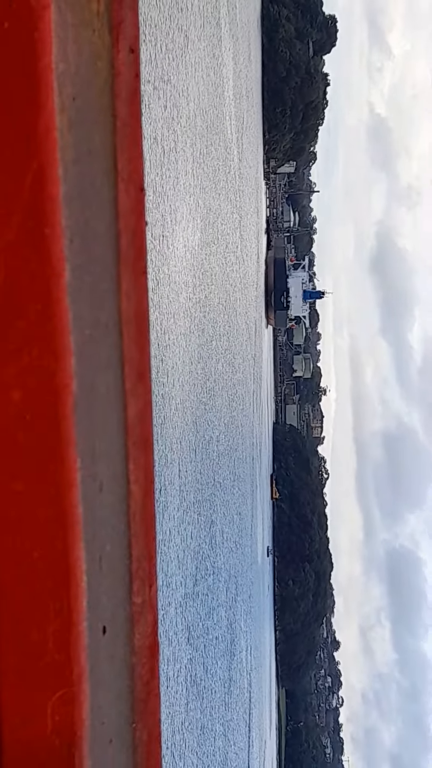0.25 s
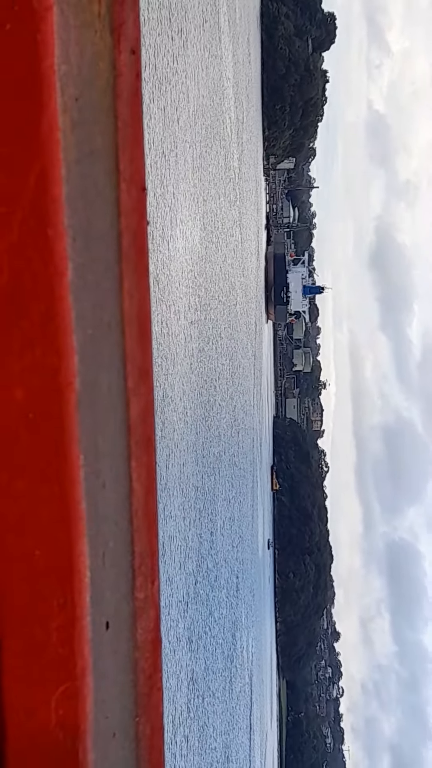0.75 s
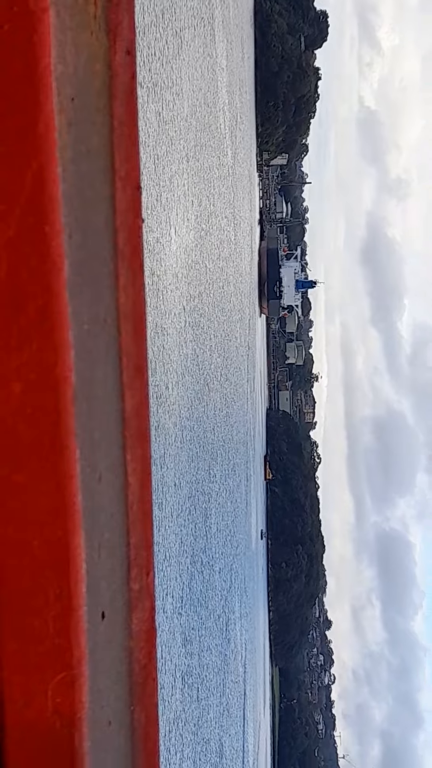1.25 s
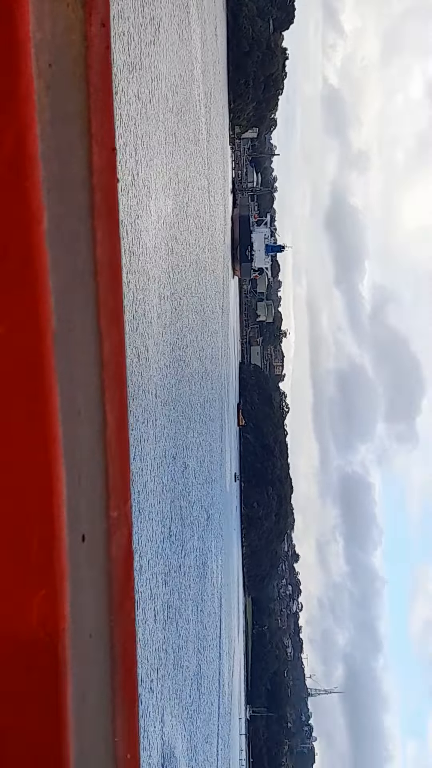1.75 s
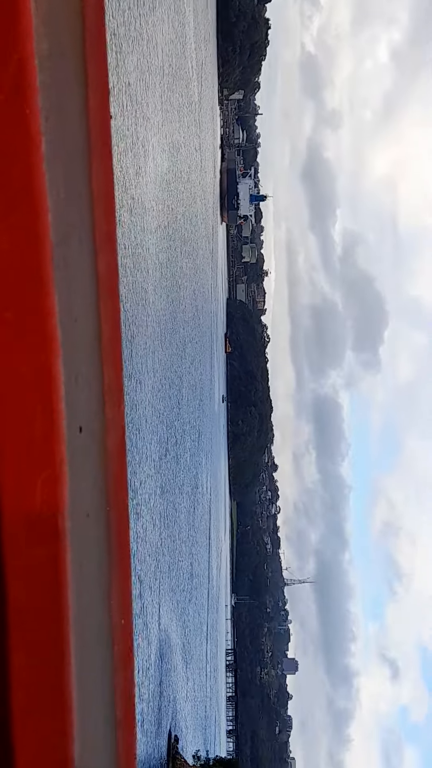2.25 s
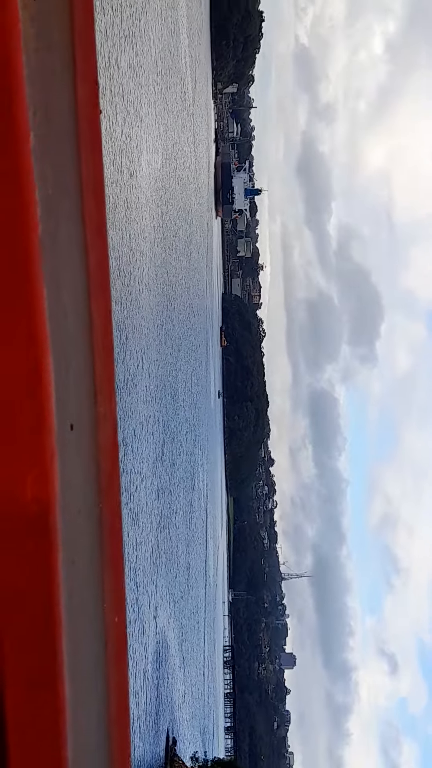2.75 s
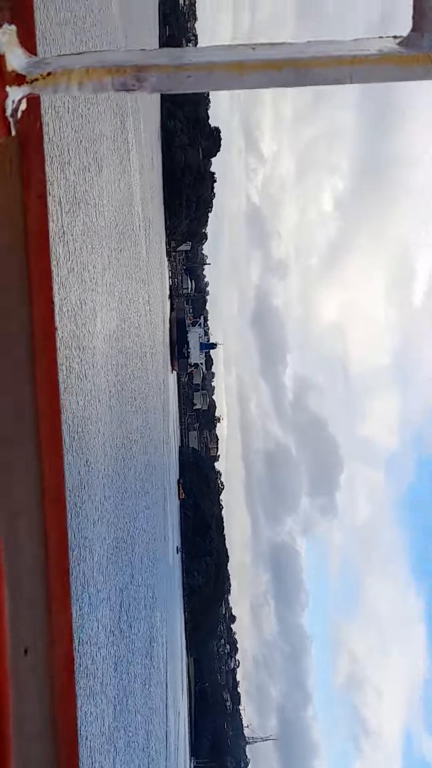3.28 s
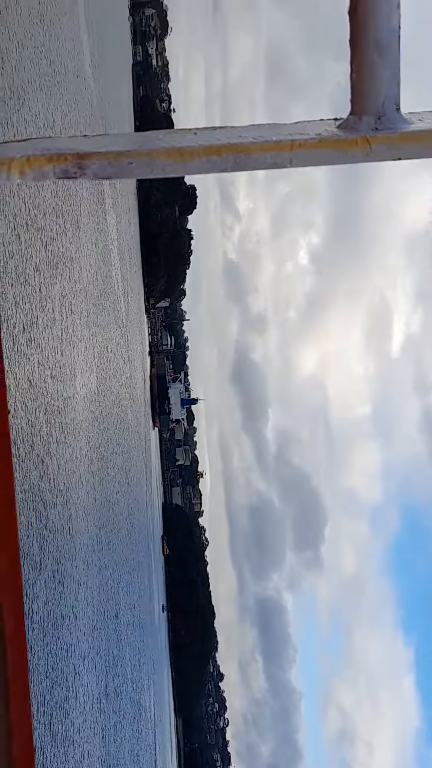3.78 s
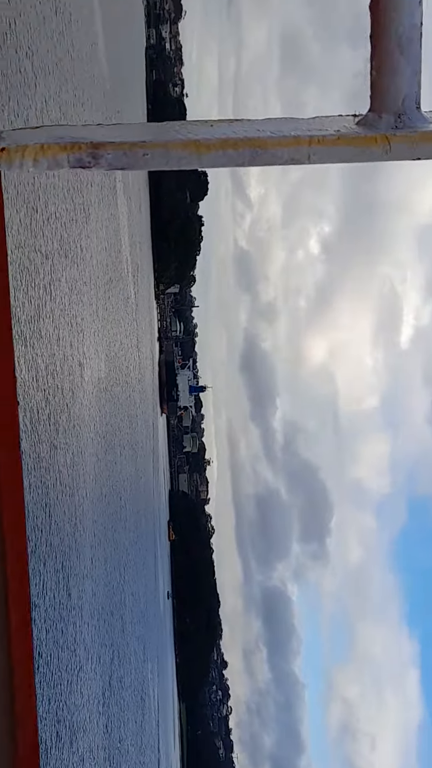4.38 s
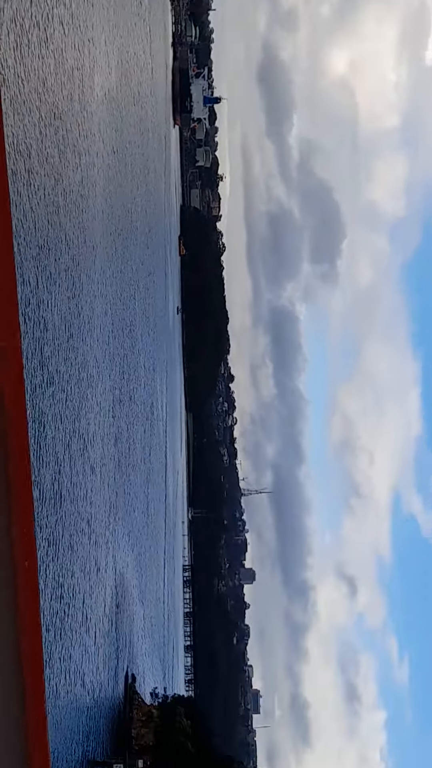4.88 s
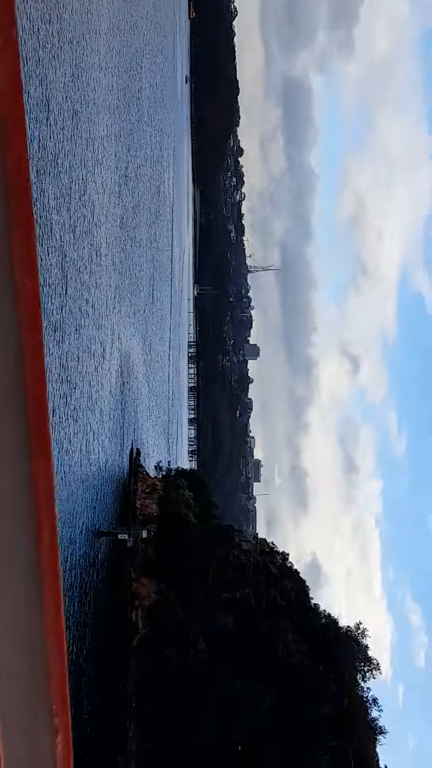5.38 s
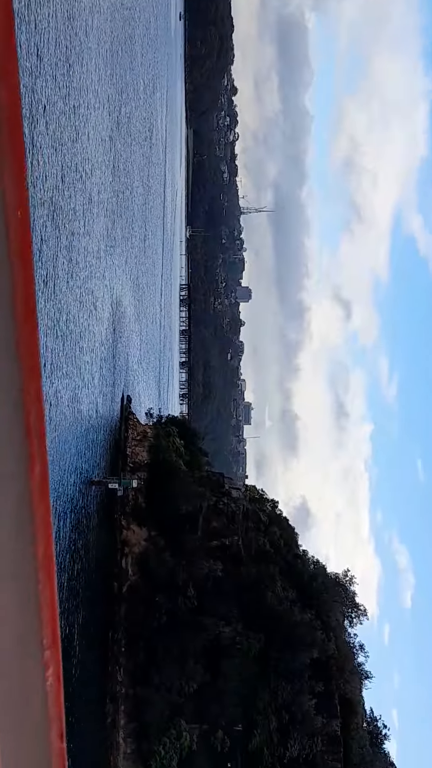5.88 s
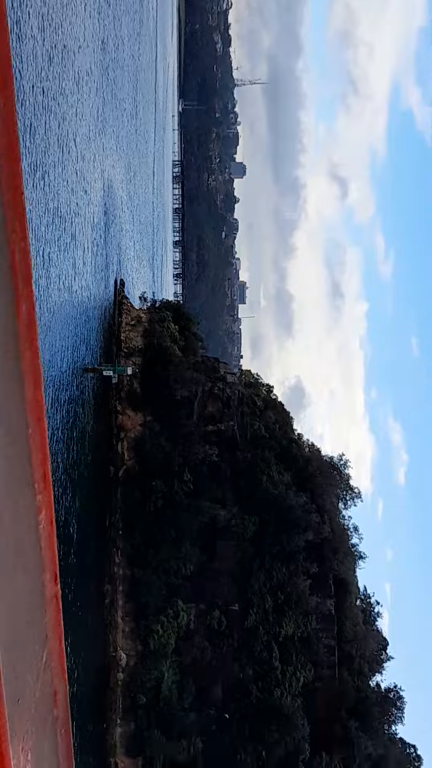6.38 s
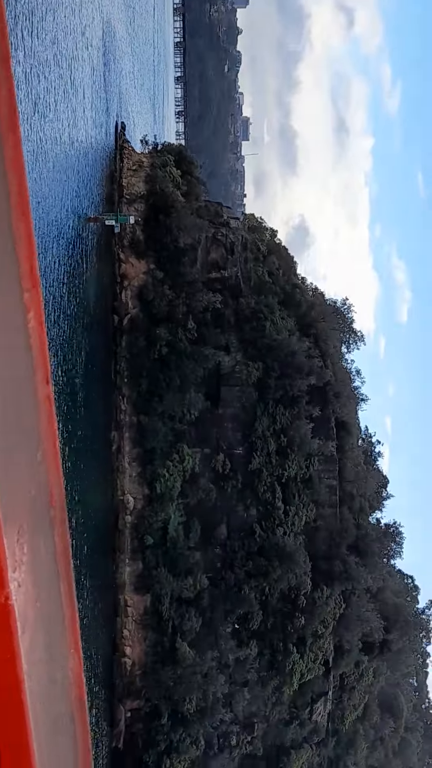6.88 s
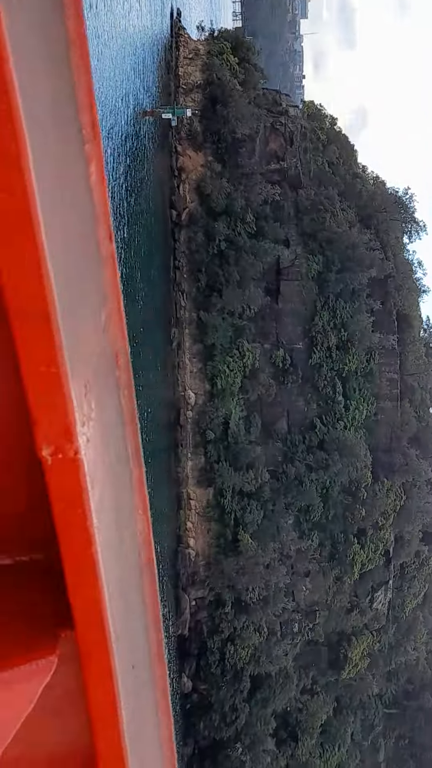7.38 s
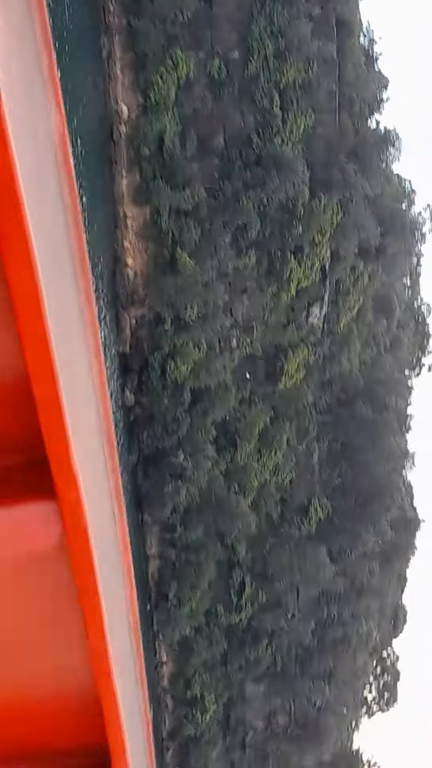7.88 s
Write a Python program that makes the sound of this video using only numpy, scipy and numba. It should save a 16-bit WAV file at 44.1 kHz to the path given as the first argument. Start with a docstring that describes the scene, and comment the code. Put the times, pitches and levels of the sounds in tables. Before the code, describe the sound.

A ship's engines throb low and steadily on an open deck for the whole eight seconds, their pulse waxing and waning under several humming machinery tones and the even roar of vents. At first a finger covers the left side of the hand-held microphone, so only the low drone comes through there, while the right side is clear. Near 2.7 seconds a few tiny, high ticks sound on the right. At about 3.2 seconds the finger peels off with a short crackling pop, and the left side opens up to the full hum and roar. From there until about 5.5 seconds the hand rustles softly on the casing in short bursts, mostly on the left, then trails away. As the microphone turns, some of the louder tones swell and dip, and the drone carries on to the end.

```python
"""On a ship's open deck two slow engines throb against each other over humming gears, pumps and
generators and roaring vents. At first a finger seals the left port of a slowly turning hand-held
phone, so that side is muffled. Near 2.7 s small ticks sound on the right. At 3.2 s the finger peels
off with a pop and the left opens up. The hand then rustles on the case in bursts, and the loud
tones swell and dip as the phone sweeps through their standing waves."""
import sys
import numpy as np
from scipy import signal
from scipy.fft import rfft, irfft
from scipy.io import wavfile
from scipy.ndimage import map_coordinates
from numba import njit

SR = 44100
rng = np.random.default_rng(int(sys.argv[2]) if len(sys.argv) > 2 else 0)


def digitize_waveform(pressure):
    """Quantize a signal to 16-bit integers and store it at the path in sys.argv[1].

    Rows of a 2-D input are taken as channels; values are limited to [-1, 1].
    """
    field = np.atleast_2d(pressure).T
    bounded = np.clip(field, -1, 1)
    quanta = np.round(bounded * 32767).astype(np.int16)
    wavfile.write(sys.argv[1], SR, quanta)


N = 358974
T = np.arange(N) / SR
HZ = np.arange(1, N // 2 + 2) * SR / N

# bed of vent roar: (frequency [Hz], left [dB/Hz], right [dB/Hz])
ROAR_BED = [(25,-75,-72), (40,-66,-59), (59.6,-53,-50), (111,-57,-53), (208,-61,-60), (304,-64.5,-56),
            (456,-67.5,-66.5), (836,-73,-75.5), (1200,-73.5,-79.5), (2150,-73,-81), (3260,-80,-91.5),
            (4980,-85,-94), (6460,-88,-112), (7760,-105,-122)]
# humps around the gear tones: (centre [Hz], width [Hz], level over the bed [dB])
ROAR_HUMPS = [(337.3, 23, 9), (677, 22, 15.5), (997, 48, 15.5), (1327, 41, 13), (1730, 48, 0.5),
              (1968, 63, 4.5), (2983, 40, 2.5)]
# slow ride on the roar: (time [s], gain [dB])
ROAR_SWELL = [(0, 0), (2, -0.5), (3.3, -0.5), (4.5, 0), (6, 1), (7, 1), (8.14, 1)]
# stereo image of the roar: (frequency [Hz], left-right likeness [-1..1])
ROAR_LIKENESS = [(60, 0.98), (240, 0.35), (950, 0.0075), (3770, -0.25), (15000, 0.23)]
# steady machinery hums: (pitch [Hz], left [dB], right [dB], left lead [rad])
HUMS = [(94, -46.1, -47.4, 0.6), (102.6, -49.1, -50.6, 0.2), (112.6, -45.1, -45.4, 0.7),
        (115.1, -48.1, -46.6, 0.1), (120.4, -42.3, -42.3, 0.2), (124, -47.1, -45.9, 0.4),
        (150.48, -35, -34, 0.5), (210.6, -44.3, -43.3, 0.9), (240.9, -48.7, -50.5, 0.7),
        (270.625, -27.4, -26.3, 0.3), (324.7, -47.4, -45.2, 0.4), (337.43, -42.6, -41.7, 0.6),
        (361.5, -39.9, -36.9, 1.7), (391.3, -49.7, -49.1, 1.1), (925.5, -45.6, -50.8, -2.1),
        (993.2, -44.8, -46.9, 2.5), (1001.8, -43.1, -46.9, -2.1), (1027.2, -48.6, -57.0, -2.8),
        (1052.8, -47.4, -54.9, -2.0), (1655.4, -55.9, -64.6, -1.1), (1797.4, -58.3, -68.1, -2.3),
        (2317.5, -61.4, -73.9, -0.1)]
# gear sidebands, split off by the shaft rate: (pitch [Hz], left [dB], right [dB], left lead [rad])
GEAR_SIDEBANDS = [(952, -46, -51, 3.0), (980, -48, -53, 3.0)]
# faint pump and gear whines: (pitch [Hz], left [dB], right [dB])
FAINT_WHINES = [(423, -57.0, -57.0), (441, -55.0, -58.0), (571, -54.0, -59.0), (681, -51.0, -52.0),
                (875, -56.0, -61.0), (1090, -61.0, -65.0), (1176, -71.0, -66.0), (1437, -61.0, -73.0),
                (1688, -61.0, -71.0), (1873, -66.0, -69.0), (2070, -62.0, -71.0), (2958, -73.0, -79.0)]
# envelope of the low hum: (time [s], level [dB])
LOW_HUM = [(0, -28), (1.2, -34), (2.6, -41), (5, -43), (8.14, -42)]
# tones standing between the plating: (pitch [Hz], level [dB], bearing [deg],
# then for each of two echoes: level [dB], bearing [deg], extra path [m])
STANDING_TONES = [(331.07, -36.2, -159.0, -25.2, 168.0, 0.305, -33.5, -98.0, 0.454),
                  (541.3, -51.0, 105.0, -42.0, -166.0, 0.026, -43.4, -62.0, 0.53),
                  (662.15, -31.3, -154.0, -34.4, 127.0, 0.257, -31.4, -131.0, 0.223),
                  (718.9, -44.0, -68.0, -38.2, 151.0, 0.196, -45.0, 85.0, 0.011),
                  (957.2, -48.7, 146.0, -43.5, -155.0, 0.33, -44.8, -103.0, 0.222),
                  (963.6, -46.0, 34.0, -46.1, 162.0, 0.12, -45.6, 100.0, 0.344),
                  (969.97, -43.2, -151.0, -48.5, 94.0, 0.258, -42.6, -54.0, 0.139),
                  (1324.3, -50.8, -15.0, -56.6, -70.0, 0.151, -48.8, 55.0, 0.049)]
# the phone's slow sweep: (time [s], heading [deg], along the deck [m], across the deck [m])
SWEEP = [(0.0, 0.0, 0.0, 0.0), (1.3, -5.0, 0.016, -0.002), (2.6, -11.0, 0.023, 0.001),
         (3.7, 23.0, -0.02, -0.045), (4.4, 24.0, -0.042, -0.045), (5.0, 1.0, 0.038, -0.009),
         (5.6, -45.0, 0.052, 0.048), (6.2, -31.0, 0.081, 0.064), (6.7, 14.0, 0.16, 0.101),
         (7.2, 30.0, 0.167, 0.145), (7.6, 33.0, 0.182, 0.187), (8.14, 63.0, 0.315, 0.269)]
# main engines: (speed [cycles/s], starting crank position [cycles])
ENGINES = [(8.043, .161), (8.2655, .506)]
# exhaust beats, one list per engine: (harmonic [x speed], level [dB])
EXHAUST_BEATS = [
    [(6, -55), (7, -24.5), (8, -29.5), (9, -55.5)],
    [(7, -42.5), (8, -26.5), (9, -36), (10, -55)],
]
# rubs of the hand: (start [s], hold [s], left [dB], right [dB], fade [dB/s])
RUBS = [(2.7, .07, -99, -71, 249.5), (3.205, .004, -49, -95, 1500), (3.22, .015, -58, -96, 170),
        (3.545, .03, -52, -77, 190), (3.65, .02, -54.5, -80, 90), (3.87, .11, -48.5, -70, 90),
        (4.08, .02, -61, -82, 301), (4.34, .03, -63.5, -90, 70), (4.58, .24, -63.5, -90, 100.5),
        (5.25, .13, -58.5, -78, 11)]
# colour of rubbing skin: (frequency [Hz], relative level [dB])
RUB_COLOUR = [(5000, -30), (8000, -22), (10000, -8), (12000, -4), (14500, 0), (16000, -2)]
# colour of the resting grip: (frequency [Hz], relative level [dB])
GRIP_COLOUR = [(6000, -20), (8000, -9), (10500, 0), (13000, -4), (16000, -8)]
# ticks by the right port: (time [s], level before filtering [dB])
TICKS = [(2.719, -44), (2.742, -40), (2.762, -38), (2.774, -41), (2.786, -39), (2.803, -38), (2.812, -27),
         (3.366, -48), (4.135, -48)]
# low-pass of the finger's seal: (time [s], corner [Hz])
SEAL_CORNER = [(0, 119), (2.9, 113.4), (3.2, 111), (3.236, 300), (3.25, 9000), (3.27, 20000)]
# skin slipping off the port: (time [s], pressure jump [dB], suction before it [dB])
SLIPS = [(3.2110, -6, -26), (3.2198, 0, -11), (3.2290, -3, -20), (3.2410, -1, -8), (3.2452, -12, -11),
         (3.2493, 2, 2.5)]
# crackle of peeling skin: (time [s], level before filtering [dB])
PEEL_CRACKLE = [(3.2, -60), (3.236, -40), (3.241, -12), (3.2465, -15), (3.249, -22), (3.253, -50),
                (3.29, -60)]
# microphone hiss: (frequency [Hz], left [dB/Hz], right [dB/Hz])
SELF_NOISE = [(1000, -118, -120), (4000, -118, -122), (7500, -123, -123), (11000, -120, -113),
              (15500, -115, -113)]

RIPPLE_HZ, RIPPLE_DB = 16, 1.6   # spacing and depth of the fine random ripple in the roar's spectrum
LOW_HZ, LOW_LEFT_DB, LOW_LEAD_RAD = 90.3, -1.5, .55
BEATS_LEFT_DB, BEATS_LEAD_RAD = -3.5, .15
PORT_GAP_M, SOUND_M_PER_S = .15, 343
SCUFF_HZ, SCUFF_GROWTH = (3500, 6640), 1.8   # the scuff gains 1.8 dB per dB of rub
SCUFF_DB, FIRM_RUB_DB = -51.5, -52.5   # scuff and rub levels at a firm rub
GRIP_LEFT_DB, GRIP_RIGHT_DB = -66, -88
RUB_RISE_S, FINGER_OFF_S = .04, 3.26
CUTOFF_HZ = 15750


def amp(db):
    """dB to gain."""
    return 10 ** (np.asarray(db) / 20)


def columns(rows, at, warp=lambda v: v):
    """Breakpoint curves: every column after the first, joined by straight lines."""
    first, *rest = np.transpose(rows)
    return np.array([np.interp(warp(at), warp(first), c) for c in rest])


def drift(rate):
    """Smooth random modulation with a spread of about 1."""
    knots = rng.standard_normal(int(N / SR * rate) + 4)
    return map_coordinates(knots, [T * rate + 1], order=3)


def filtered(x, order, hz, kind):
    """Butterworth filter."""
    return signal.sosfilt(signal.butter(order, hz, kind, fs=SR, output="sos"), x)


def noise(db_per_hz, alike, right_lag_s=0):
    """Coloured stereo noise; the likeness of the two sides sets its width."""
    mid, side = rfft(rng.standard_normal((2, N)))
    pair = np.sqrt(1 + alike) * mid + np.sqrt(1 - alike) * side * [[1], [-1]]
    pair = pair * [np.ones(len(HZ)), np.exp(-2j * np.pi * HZ * right_lag_s)]
    return irfft(pair * amp(db_per_hz) * np.sqrt(SR) / 2, N)


def tone(hz, left_db, right_db, lead, start, waver_db):
    """A stereo sine wavering around the given rms levels."""
    phase = 2 * np.pi * hz * T + start
    waver = np.sqrt(2) * amp(waver_db * drift(rate=2.948))
    return waver * np.array([amp(left_db) * np.cos(phase + lead), amp(right_db) * np.cos(phase)])


def any_phase():
    """A random angle in radians."""
    return rng.uniform(0, 2 * np.pi)


def vent_roar():
    """Vent roar with noisy humps around the gear tones and a fine random ripple."""
    humps = 1 + sum(amp(2 * db) / (1 + (2 * (HZ - hz) / width) ** 2) for hz, width, db in ROAR_HUMPS)
    rolloff_db = 30 * np.log2(np.maximum(HZ / 7700, 1))
    knots = rng.standard_normal(int(SR / RIPPLE_HZ))
    ripple = map_coordinates(knots, [HZ / RIPPLE_HZ], order=3) * np.clip(4000 / HZ, 0, 1) ** 2
    level_db = columns(ROAR_BED, HZ, np.log) + 10 * np.log10(humps) - rolloff_db + RIPPLE_DB * ripple
    alike = columns(ROAR_LIKENESS, HZ, np.log)[0]
    bed = noise(level_db, alike, right_lag_s=.00017)
    return bed * amp(columns(ROAR_SWELL, T) + .4 * drift(rate=6.0))


def twin_machine(hz_off, db, in_step_s):
    """A second machine runs a little off speed: a turning phasor that beats against the first."""
    return amp(db) * np.exp(2j * np.pi * hz_off * (T - in_step_s))


def standing_tone(row, twin=0):
    """Three arrivals of one tone add or cancel at each port as the phone moves."""
    hz, db, bearing, *echoes = row
    heading, along, across = columns(SWEEP, T)
    ports = along + 1j * across + PORT_GAP_M / 2 * np.exp(1j * np.radians(heading)) * [[-1], [1]]
    nearer_m = lambda degrees: (ports * np.exp(-1j * np.radians(degrees))).real
    wave = lambda path_m: np.exp(-2j * np.pi * hz * path_m / SOUND_M_PER_S)
    field = (amp(db) + twin) * wave(-nearer_m(bearing))
    for db, bearing, extra_m in np.reshape(echoes, (2, 3)):
        field = field + amp(db) * wave(extra_m - nearer_m(bearing))
    left_db, right_db = 20 * np.log10(abs(field))
    return tone(hz, left_db, right_db, np.angle(field[0] / field[1]), any_phase(), waver_db=1.15)


def machinery():
    """Gears, pumps and generators drone; twins beat against the low hum and the lowest standing tone."""
    hums = sum(tone(*row, any_phase(), waver_db=1.1) for row in HUMS + GEAR_SIDEBANDS)
    whines = sum(tone(*row, any_phase(), any_phase(), waver_db=4.5) for row in FAINT_WHINES)
    low = amp(columns(LOW_HUM, T)[0]) + twin_machine(hz_off=.62, db=-43, in_step_s=.2)
    low_db = 20 * np.log10(abs(low))
    low_hum = tone(LOW_HZ, low_db + LOW_LEFT_DB, low_db, LOW_LEAD_RAD, np.angle(low), waver_db=1.55)
    lowest, *higher = STANDING_TONES
    beating = standing_tone(lowest, twin_machine(hz_off=-.614, db=-38.5, in_step_s=-.17))
    return hums + whines + low_hum + beating + sum(standing_tone(row) for row in higher)


def engines():
    """Exhaust beats locked to each crank; the two speeds differ, so the throb waxes and wanes."""
    return sum(tone(k * rate, db + BEATS_LEFT_DB, db, BEATS_LEAD_RAD, 2 * np.pi * k * crank, waver_db=.5)
               for (rate, crank), beats in zip(ENGINES, EXHAUST_BEATS) for k, db in beats)


def rub_envelopes():
    """Level in dB at each port: every rub rises, holds and fades."""
    power = 1e-12
    for start, hold_s, left_db, right_db, fade in RUBS:
        attack = np.clip((T - start) / RUB_RISE_S, 0, 1) ** 2
        release = amp(-fade * np.maximum(T - start - RUB_RISE_S - hold_s, 0))
        power = power + (amp([[left_db], [right_db]]) * attack * release) ** 2
    return 10 * np.log10(power)


def ticks():
    """Tiny clicks with only their top end left."""
    clicks = np.zeros(N)
    for time, db in TICKS:
        clicks[round(time * SR)] = amp(db)
    return filtered(clicks, 4, 10500, "high")


def hand_rustle():
    """Skin on the case: bright grainy rubs, a duller scuff, the grip's faint hiss and a few ticks."""
    left_db, right_db = rub_envelopes()
    rub = noise(columns(RUB_COLOUR, HZ, np.log), alike=0)
    rub = rub / rub.std() * amp(.8 * drift(rate=60.0))
    scuff = filtered(rng.standard_normal(N), 2, SCUFF_HZ, "band")
    scuff = scuff / scuff.std() * amp(SCUFF_DB + SCUFF_GROWTH * (left_db - FIRM_RUB_DB))
    grip = noise(columns(GRIP_COLOUR, HZ, np.log), alike=0)
    grip = grip / grip.std() * amp([[GRIP_LEFT_DB], [GRIP_RIGHT_DB]])
    left = rub[0] * amp(left_db) + (scuff + grip[0]) * (T > FINGER_OFF_S)
    right = rub[1] * amp(right_db) + grip[1] + ticks()
    return np.array([left, right])


@njit
def swept_lowpass(x, share):
    """One-pole low-pass with a moving corner."""
    out, held = np.empty_like(x), 0.0
    for i in range(len(x)):
        held += share[i] * (x[i] - held)
        out[i] = held
    return out


def finger_seal(sound):
    """The sealed port lets the lows through, then snaps open as the finger lifts."""
    times, corners = np.transpose(SEAL_CORNER)
    corner_hz = np.exp(np.interp(T, times, np.log(corners)))
    return swept_lowpass(sound, 1 - np.exp(-2 * np.pi * corner_hz / SR))


def finger_pop():
    """The skin crackles off; each slip sucks the membrane out, and it springs back and swings once."""
    thumps = np.zeros(N)
    for time, jump_db, suction_db in SLIPS:
        before, after = np.minimum(T - time, 0), np.maximum(T - time, 0)
        spring = np.exp(-after / .001)
        swing = np.exp(-after / .006) * np.cos(2 * np.pi * 80 * after)
        thumps -= amp(suction_db) * np.exp(before / .0005) * spring
        thumps += amp(jump_db) * (1 - spring) * swing
    peeling = (T > 3.2) & (T < 3.29)
    crackle = amp(columns(PEEL_CRACKLE, T)[0]) * peeling * rng.standard_normal(N)
    return filtered(thumps + crackle, 3, (35, 2100), "band")


def scene():
    """The ship, its left side heard through the finger's seal, with the pop and rustle on top."""
    left, right = engines() + machinery() + vent_roar()
    left = finger_seal(left) + finger_pop()
    return np.array([left, right]) + hand_rustle()


def record(dry):
    """The microphones add their hiss, and a steep low-pass trims the top."""
    hiss = noise(columns(SELF_NOISE, HZ, np.log), alike=0)
    return signal.sosfilt(signal.ellip(14, .5, 70, CUTOFF_HZ, fs=SR, output="sos"), dry + hiss)


dry = scene()
out = record(dry)
digitize_waveform(out)
```